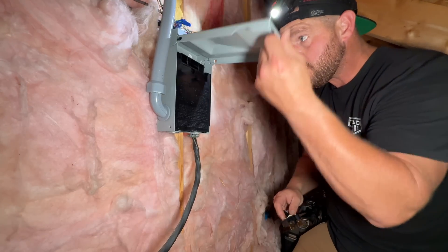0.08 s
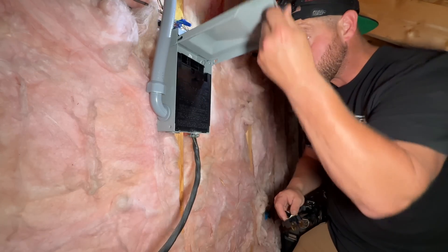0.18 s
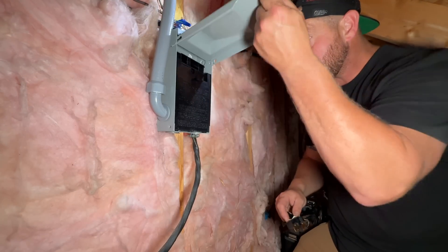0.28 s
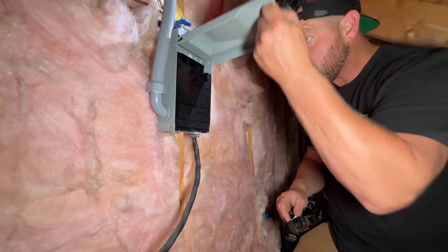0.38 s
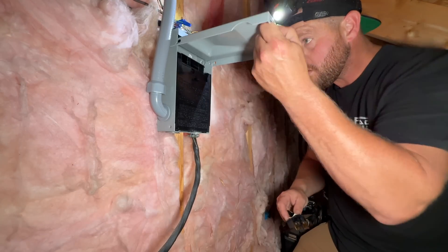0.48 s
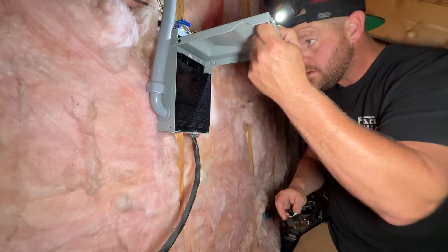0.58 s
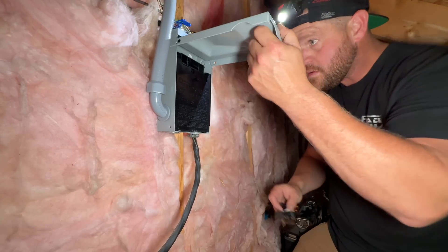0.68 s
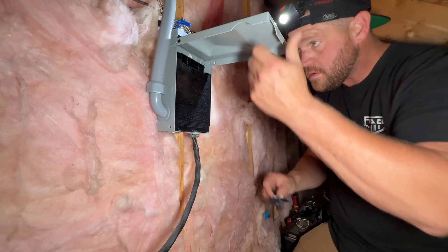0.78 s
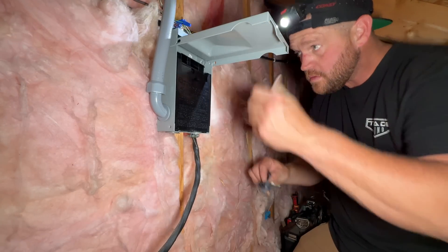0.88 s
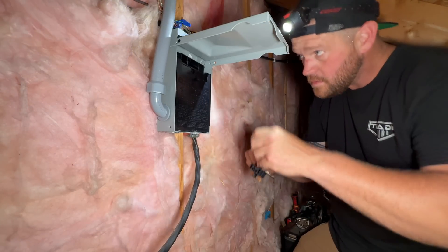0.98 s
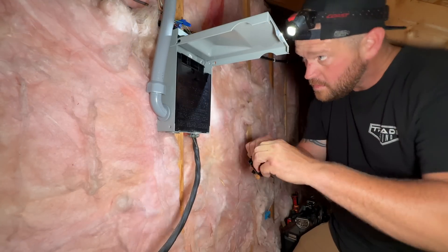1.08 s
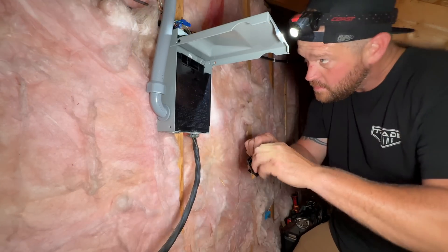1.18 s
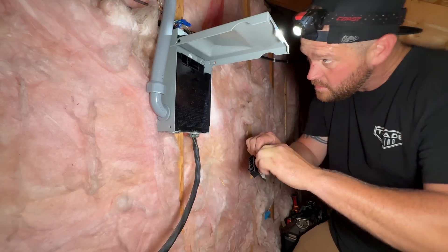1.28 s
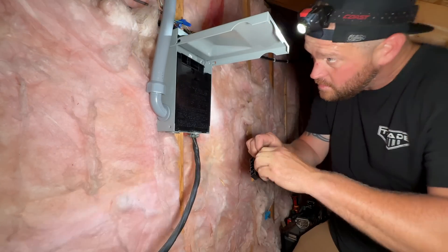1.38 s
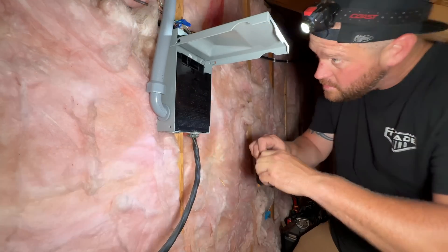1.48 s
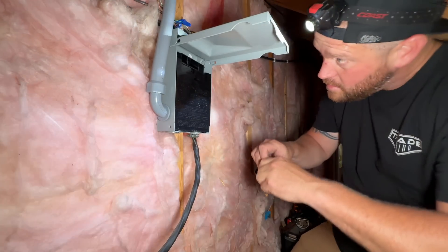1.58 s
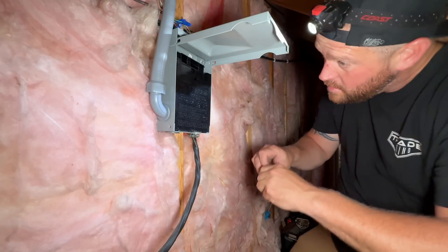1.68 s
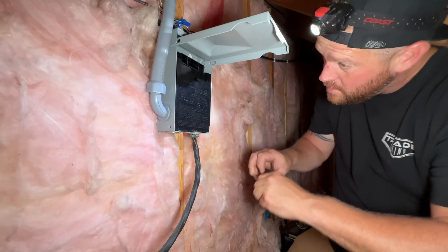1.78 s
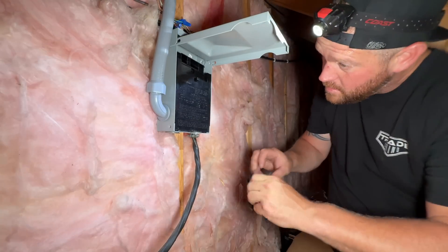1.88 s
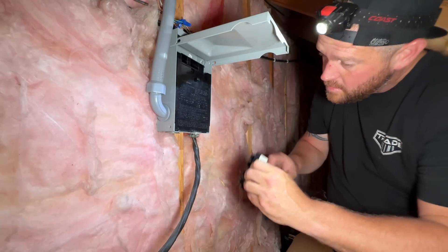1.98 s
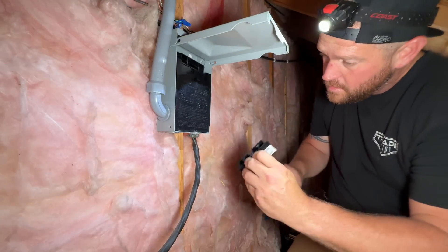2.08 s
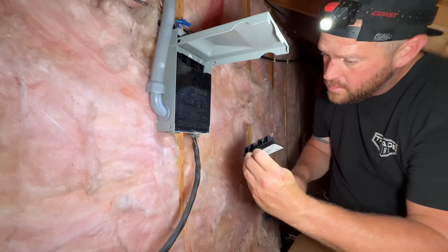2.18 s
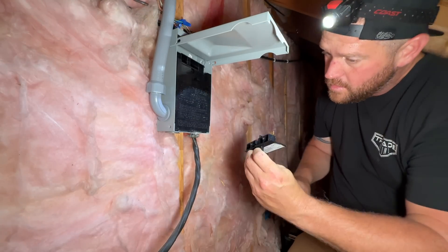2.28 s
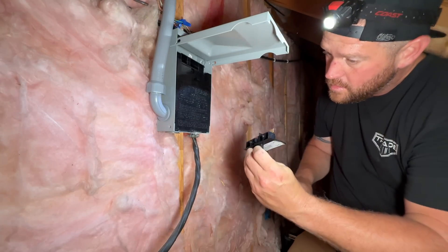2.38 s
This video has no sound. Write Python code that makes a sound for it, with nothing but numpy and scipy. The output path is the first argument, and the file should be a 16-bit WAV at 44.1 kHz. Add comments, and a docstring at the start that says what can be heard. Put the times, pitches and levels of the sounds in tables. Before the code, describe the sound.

Loud metal cover clack with a wall thud, light rebound taps, then faint plastic fuse-holder ticking

```python
"""Dead, insulated room: a sheet-metal cover is pushed up on its hinge until it clacks into its catch.
The hinge squeaks (narrow noise) and hisses; the clack is noise ringing the box modes plus a banded crack.
The stud wall thuds and shakes: swelling low sines over narrow noise. The cover rebounds, taps and settles.
Hands then turn a small plastic fuse holder: ticks ring short modes, rubbing is patchy hiss with chatter.
Faint coloured air noise throughout."""
import sys
import numpy as np
from scipy import signal
from scipy.fft import rfft, irfft
from scipy.io import wavfile
from scipy.ndimage import uniform_filter1d

SR = 44100
rng = np.random.default_rng(int(sys.argv[2]) if len(sys.argv) > 2 else 0)


def put_to_file(sound):
    """Save the sound as 16-bit audio at rate SR, in the file named by the first command-line argument."""
    columns = np.atleast_2d(sound).T  # one column per channel
    safe = np.clip(columns, -1, 1)
    whole_steps = np.round(safe * 32767)
    wavfile.write(sys.argv[1], SR, whole_steps.astype(np.int16))


N = 105840
T = np.arange(N) / SR

# cover sliding on its hinge, push and rebounds: t/s, squeak and hiss level/dB, box rattle level/dB
SLIDE_CURVE = [(0, -63, -74), (.08, -55.5, -73), (.15, -50, -58.5), (.19, -45, -62), (.26, -47, -40),
               (.3, -64, -43), (.335, -69.5, -51.5), (.35, -51.5, -44.5), (.385, -67, -63),
               (.41, -55, -50.5), (.455, -49, -44), (.48, -64.5, -58), (.515, -56, -69.5),
               (.545, -64, -71.5), (.6, -69, -63.5), (.68, -87, -76), (.75, -92.5, -70), (.95, -95, -80)]
# hinge squeak bands: f/Hz, width/Hz, relative level/dB
HINGE_BANDS = [(495, 55, -6), (1180, 80, 0), (1740, 70, -11), (1875, 70, -11), (2580, 110, -18),
               (3480, 90, -20)]
# slide hiss colour: f/Hz, relative level/dB
SLIDE_COLOUR = [(400, -15), (900, -4), (1400, -6.5), (4000, -13.5), (9300, -17.5), (12000, -42.5),
                (15000, -25.5)]
# box and gripped cover, rung by the clack: f/Hz, relative level/dB, t60/s
BOX_MODES = [(612, -11, .11), (920, -18, .09), (1090, -19, .07), (1185, -13, .075), (1590, -23, .07),
             (1765, -23, .2), (2480, -21, .08), (2810, -23, .055), (6220, -28, .05), (9030, -27, .045)]
# cover swinging free, rung by taps: f/Hz, relative level/dB, t60/s
COVER_MODES = [(635, -12, .45), (950, -9, .25), (1250, -4, .13), (1755, -2, .1), (2660, -19, .45),
               (3170, -12, .12), (4340, -20, .12), (8410, -15, .14)]
# taps on the cover: t/s, relative level/dB
TAPS = [(0.3445, -48.5), (0.403, -50.5), (0.7111, -46)]
# crack colour, clack and taps: f/Hz, relative level/dB
CRACK_COLOUR = [(250, -8), (600, -10), (1200, -7.5), (2500, -8), (5000, -16.5), (9000, -15.5), (11500, -27),
                (15000, -15.5)]
# crack decay: f/Hz, t60/s
CRACK_T60 = [(300, 0.095), (1000, 0.079), (3000, 0.074), (8000, 0.058), (15000, 0.026)]
# cover at the two ports: f/Hz, left over right level/dB
COVER_PAN = [(200, 7.5), (500, -1.5), (1000, 8), (2000, -3), (4000, 6), (8000, -1.5), (13000, 0.5)]
# cover at the two ports: f/Hz, left phase lead/rad
COVER_PHASE = [(100, 0), (1000, 2.5), (3000, 1.26), (8000, 1.22), (14000, 2.5)]
# stud wall modes: f/Hz, start delay/s, swell time/s, left phase lead/rad
WALL_MODES = [(53.2, 0.012, 0.019, .02), (78.5, 0.018, .022, .06), (124, 0.0081, 0.016, 0.51),
              (161, 0.0086, 0.013, 0.78), (277, 0.011, 0.0018, 1)]
# thuds through the wall: t/s, then level/dB in each wall mode
THUDS = [(0.203, -9.5, -20.5, -14, -8.5, -8.5), (.352, -35, -31, -30, -33.5, -40),
         (0.44, -49.5, -36.5, -26.5, -34.5, -47), (1.695, -27.5, -33.5, -45.5, -44.5, -54),
         (1.746, -35, -65, -56, -59, -80)]
# low shaking of wall and cover: t/s, deep level/dB, upper level/dB
SHAKE_CURVE = [(0, -46.5, -49), (.12, -48, -50), (.17, -77, -39.5), (0.221, -34, -39),
               (0.321, -28.5, -38.5), (0.401, -31, -40.5), (.5, -51, -44.5), (0.571, -44.5, -52.5),
               (0.722, -52.5, -63), (0.758, -42, -51), (.86, -48, -61), (1.05, -47.5, -68.5),
               (1.11, -64.5, -74.5), (1.2, -59.5, -67), (1.31, -67.5, -78.5), (1.48, -71, -74.5),
               (1.55, -65.5, -63.5), (1.679, -55, -66), (1.822, -45, -59), (1.941, -62.5, -70),
               (2.2, -66, -69), (2.4, -70, -80)]
# air noise colour: f/Hz, relative level/dB
AIR_COLOUR = [(88, -32.5), (150, 5), (500, -19), (1600, -9.5), (4080, -14), (9820, -3.5), (12700, -49),
              (16000, -50)]
# stereo noise: f/Hz, left-right correlation
LIKENESS = [(100, 0.83), (300, 0.17), (1000, 0.34), (12000, 0.1)]
# fingers rubbing: t/s, dull (cloth) level/dB, bright (plastic) level/dB
RUB_CURVE = [(.55, -71, -58), (.8, -74, -83), (0.951, -85, -78.5), (1.49, -82.5, -80),
             (1.519, -59.5, -67.5), (1.56, -68.5, -76.5), (1.7, -61.5, -74), (1.851, -66.5, -67.5),
             (1.999, -70.5, -75), (2.119, -68, -57.5), (2.199, -74, -65), (2.26, -86, -89.5),
             (2.4, -89, -84)]
# cloth hiss colour: f/Hz, relative level/dB
DULL_COLOUR = [(150, -3), (450, -3.5), (850, -4.5), (1300, -4), (2200, -13), (5000, -25.5)]
# plastic hiss colour: f/Hz, relative level/dB
BRIGHT_COLOUR = [(1000, -22), (2200, 1.5), (3800, 5.5), (6000, -6), (9800, -13), (11500, -31.5)]
# small-part ticks: t/s, relative level/dB, pitch/Hz, hold/s, left over right level/dB, ring over snap/dB
TICKS = [(0.5938, -64, 2230, 0.011, 18, 26), (0.666, -61.5, 3810, 0.0017, 19.5, 20.5),
         (1.034, -49, 3570, 0.014, 12, 8), (1.09, -58.5, 4980, 0.0076, 8.5, -11.5),
         (1.187, -54, 4000, 0.01, 4, -4.5), (1.2053, -39.5, 5940, 0.008, 4.5, -8),
         (1.371, -60.5, 6000, 0.026, 7, -8.5), (1.5063, -54, 3300, 0.031, 14.5, -1.5),
         (1.594, -64, 944, 0.011, -5.5, 17), (1.695, -66.5, 3770, 0.0025, 8, 22.5),
         (1.733, -41, 4690, 0.012, -11, 0), (1.76, -44, 4320, 0.0019, 16, 5),
         (1.8076, -49, 4010, 0.0052, 15, 12), (1.908, -58.5, 4000, 0.0051, 8, 10.5),
         (2.0672, -49.5, 3415, 0.0057, -28, 13.5), (2.0935, -59.5, 2960, 0.0007, 6, 22.5),
         (2.1423, -42, 2590, 0.00057, -8, 18), (2.1464, -50, 3390, 0.0007, -15, 22),
         (2.1895, -50.5, 3980, 0.007, 14, 9.5)]
# small plastic parts: multiple of pitch, relative level/dB
PLASTIC_MODES = [(.8, -8), (1, 0), (1.15, -6), (1.4, -12)]

SQUEAK_EVENNESS, SLIDE_HISS_DB = .25, -7
BOX_LOW_HZ, BOX_HIGH_HZ = 176, 614
CLACK_S, CLACK_HOLD_S, CLACK_RISE_S = .2012, .014, .0021
CLACK_CRACK_DB, TAP_CRACK_DB, TAP_RING_DB = -2, -1.5, -34.5  # offsets
TAP_CRACK_MIN_HZ, CRACK_APART = 800, 1
DEEP_HZ, DEEP_WIDTH_HZ, UPPER_HZ, UPPER_WIDTH_HZ, SHAKE_EVENNESS = 48.4, 20, 104.4, 60, .89
AIR_DB = -77.5
CHATTER_PER_S, CHATTER_DB, RUB_PATCHY_DB, RUB_FADE_IN_S = 120, -7, 3, .18
PLASTIC_T60_S = .017
TICK_RISE_S, CONTACT_T60_S, SNAP_T60_S, SNAP_SPREAD = .0005, .005, .052, 2.6
TICK_TOP_HZ, TICK_LEFT_LAG_S, TICK_OFFSET_DB = 9940, .00017, -7
LOW_CUT_HZ, CEILING = 38, 1.2
NOTCH_HZ, NOTCH_Q, STOP_HZ = 12600, 5.9, 16640


def amp(db):
    """dB to gain."""
    return 10 ** (np.asarray(db) / 20)


def unit(x):
    """Scale to rms 1."""
    return x / np.sqrt(np.mean(x ** 2) + 1e-20)


def in_time(rows):
    """Columns of a time curve, sample by sample."""
    s, *cols = np.transpose(rows)
    return [np.interp(T, s, c) for c in cols]


def at_hz(points, hz):
    """Read a table on a log-frequency axis."""
    p = np.array(points, float)
    return np.interp(np.log(hz + 1), np.log(p[:, 0] + 1), p[:, 1])


def ring(x, hz, t60_s):
    """One decaying mode: two-pole resonator driven by x."""
    radius = amp(-60 / (t60_s * SR))
    w = 2 * np.pi * hz / SR
    return signal.lfilter([0, np.sin(w)], [1, -2 * radius * np.cos(w), radius ** 2], x + 1e-18)


def band(x, low_hz, high_hz):
    """Band-pass."""
    sos = signal.butter(2, [low_hz, min(high_hz, .45 * SR)], "band", fs=SR, output="sos")
    return signal.sosfilt(sos, x)


def burst(start_s, hold_s, t60_s, rise_s=.003):
    """Envelope: linear rise, hold, exponential fall."""
    rise = np.clip((T - start_s) / rise_s, 0, 1)
    return rise * amp(-60 * np.clip(T - start_s - hold_s, 0, 2) / t60_s)


def steady(hz, width_hz, evenness):
    """Narrow noise with its swells evened out by its own envelope; rms 1."""
    x = unit(band(rng.standard_normal(N + SR), hz - width_hz / 2, hz + width_hz / 2))
    evened = x / (np.abs(signal.hilbert(x)) + .1) ** evenness
    return unit(band(evened, hz / 1.5, hz * 1.4)[SR:])  # drop the filter's first second


def wide_noise(colour):
    """Stereo noise above 120 Hz, mid and side mixed to the tabled correlation; rms 1."""
    hz = np.arange(N // 2 + 1) * SR / N
    mid, side = rfft(rng.standard_normal((2, N))) * amp(at_hz(colour, hz)) * (hz > 120)
    c = np.clip(at_hz(LIKENESS, hz), 0, 1)
    return unit(irfft(np.sqrt(1 + c) * mid + np.sqrt(1 - c) * side * [[1], [-1]], N))


def ports(x):
    """Level and phase differences, by frequency, between the two microphone ports."""
    hz = np.arange(N // 2 + 1) * SR / N
    half = amp(at_hz(COVER_PAN, hz) / 2) * np.exp(.5j * at_hz(COVER_PHASE, hz))
    return irfft(rfft(x) * np.array([half, 1 / half]), N)


def slide():
    """Hinge friction: narrow squeaks and wide hiss, with a low rattle of the box."""
    friction, rattle = amp(in_time(SLIDE_CURVE)) * (T < SLIDE_CURVE[-1][0])
    squeak = sum(amp(db) * steady(hz, width_hz, SQUEAK_EVENNESS) for hz, width_hz, db in HINGE_BANDS)
    box = band(rng.standard_normal(N), BOX_LOW_HZ, BOX_HIGH_HZ)
    box = unit(band(box, BOX_LOW_HZ, BOX_HIGH_HZ))
    hiss = friction * amp(SLIDE_HISS_DB) * wide_noise(SLIDE_COLOUR)
    return ports(friction * unit(squeak) + rattle * box) + hiss


def clack_and_tap_rings():
    """Clack: spiky noise rings the box modes. Taps: short sine bursts ring the free cover modes."""
    out = 0
    for hz, db, t60_s in BOX_MODES:
        spiky = rng.standard_normal(N) ** 3
        rung = ring(burst(CLACK_S, CLACK_HOLD_S, .02, CLACK_RISE_S) * spiky, hz, t60_s)
        out = out + amp(db) * rung / np.abs(rung).max()
    push = sum(amp(db + TAP_RING_DB) * burst(s, .0021, .0072) for s, db in TAPS)
    for hz, db, t60_s in COVER_MODES:
        out = out + amp(db) * ring(push * np.sin(2 * np.pi * hz * T), hz, t60_s)
    return ports(out)


def crack():
    """Broad crack of clack and taps: third-octave noise bands, each with its own decay."""
    # common spiky part plus separate left and right parts; two sets, alternating by band
    rattle = rng.laplace(size=(2, 1, N)) + CRACK_APART * rng.standard_normal((2, 2, N))
    edges_hz = 250 * 2 ** np.arange(0, 6.1, 1 / 3)
    out = 0
    for k, (low_hz, high_hz) in enumerate(zip(edges_hz, edges_hz[1:])):
        t60_s = at_hz(CRACK_T60, low_hz)
        shape = amp(CLACK_CRACK_DB) * burst(CLACK_S, CLACK_HOLD_S, t60_s, CLACK_RISE_S + 1 / low_hz)
        if low_hz > TAP_CRACK_MIN_HZ:
            shape = shape + sum(amp(db + TAP_CRACK_DB) * burst(s, .01, t60_s) for s, db in TAPS)
        gain = amp(at_hz(CRACK_COLOUR, np.sqrt(low_hz * high_hz)))
        out = out + gain * shape * band(rattle[k % 2], low_hz, high_hz)
    return ports(out)


def wall():
    """Thuds swell and die in each wall mode after its delay; narrow low noise shakes on between."""
    out = 0
    for s, *levels_db in THUDS:
        for (hz, delay_s, swell_s, lead_rad), db in zip(WALL_MODES, levels_db):
            t = np.clip(T - s - delay_s, 0, None)
            swell = (t / swell_s) ** 2 * np.exp(2 - 2 * t / swell_s)  # peaks at 1 when t = swell_s
            phase = np.array([[lead_rad / 2], [-lead_rad / 2]])
            out = out + amp(db) * swell * np.sin(2 * np.pi * hz * t + phase)
    bands = ((DEEP_HZ, DEEP_WIDTH_HZ), (UPPER_HZ, UPPER_WIDTH_HZ))
    for db, (hz, width_hz) in zip(in_time(SHAKE_CURVE), bands):
        out = out + amp(db) * steady(hz, width_hz, SHAKE_EVENNESS)
    return out


def air():
    """Constant coloured stereo noise."""
    return amp(AIR_DB) * wide_noise(AIR_COLOUR)


def plastic(x, hz):
    """Short modes of a small plastic part, driven by x."""
    return sum(amp(db) * ring(x, hz * ratio, PLASTIC_T60_S) for ratio, db in PLASTIC_MODES)


def rub():
    """Uneven friction hiss, dull and bright, with a fine chatter of tiny contacts."""
    out = 0
    for db, colour, hz in zip(in_time(RUB_CURVE), (DULL_COLOUR, BRIGHT_COLOUR), (1250, 3900)):
        patchy = unit(uniform_filter1d(rng.standard_normal(N), size=400))
        hits = rng.random(N) < CHATTER_PER_S / SR
        clicks = hits * rng.standard_normal(N) * rng.exponential(1, N)
        chatter = ports(unit(plastic(clicks, hz)))
        level = amp(db + RUB_PATCHY_DB * patchy)
        out = out + level * (wide_noise(colour) + amp(CHATTER_DB) * chatter)
    return out * np.clip((T - RUB_CURVE[0][0]) / RUB_FADE_IN_S, 0, 1)


def ticks():
    """A quick run of uneven contacts rings a few short plastic modes over a broad snap."""
    out = np.zeros((2, N))
    for s, db, hz, hold_s, pan_db, ring_db in TICKS:
        x = rng.laplace(size=N)
        contacts = band(x * burst(s, hold_s, CONTACT_T60_S, TICK_RISE_S), hz / 2, hz * 2)
        tone = plastic(contacts, hz)
        tone = amp(ring_db) * tone / np.abs(tone).max()
        snap = unit(band(x, hz / SNAP_SPREAD, hz * SNAP_SPREAD * 1.6))
        right = tone + burst(s, hold_s, SNAP_T60_S, TICK_RISE_S) * snap
        left = np.interp(T - TICK_LEFT_LAG_S, T, right)
        out += amp(db + TICK_OFFSET_DB) * np.array([amp(pan_db / 2) * left, amp(-pan_db / 2) * right])
    return signal.sosfilt(signal.butter(8, TICK_TOP_HZ, fs=SR, output="sos"), out)


def scene():
    """Sum of all sources."""
    cover = slide() + clack_and_tap_rings() + crack()
    return cover + wall() + air() + rub() + ticks()


def record(dry):
    """Microphone: deepest bass lost, peaks rounded, deaf treble notch (applied twice), top cut."""
    x = signal.sosfilt(signal.butter(3, LOW_CUT_HZ, "high", fs=SR, output="sos"), dry)
    x = CEILING * np.tanh(x / CEILING)
    b, a = signal.iirnotch(NOTCH_HZ, NOTCH_Q, fs=SR)
    x = signal.lfilter(b, a, signal.lfilter(b, a, x))
    return signal.sosfilt(signal.cheby2(12, 70, STOP_HZ, fs=SR, output="sos"), x)


dry = scene()
out = record(dry)
put_to_file(out)
```